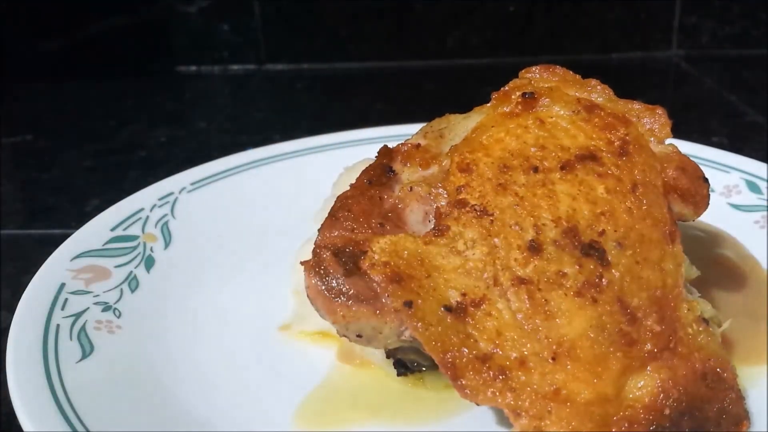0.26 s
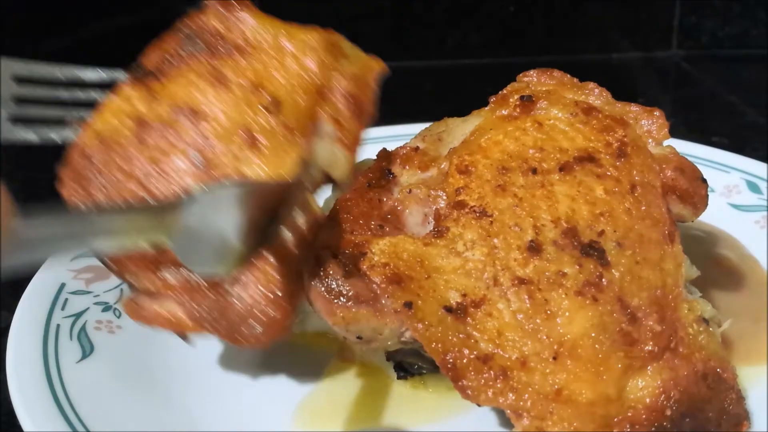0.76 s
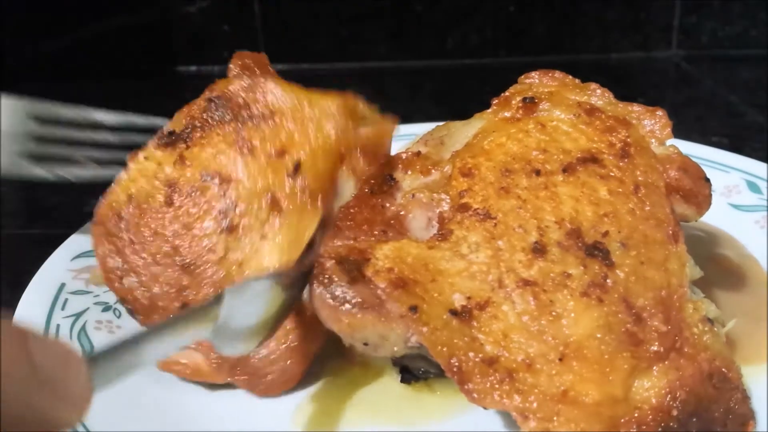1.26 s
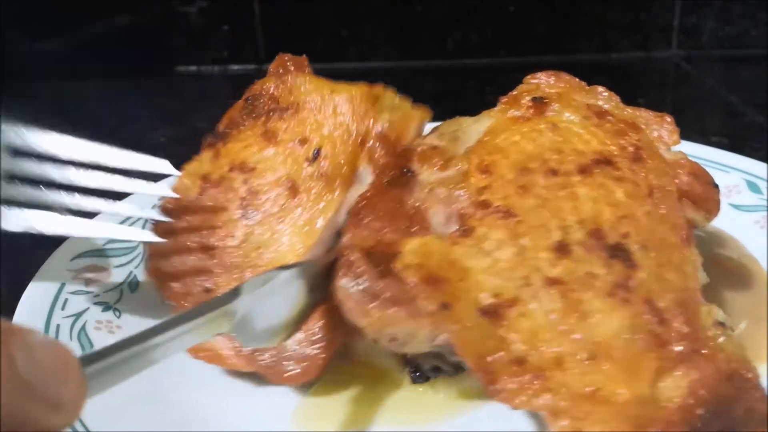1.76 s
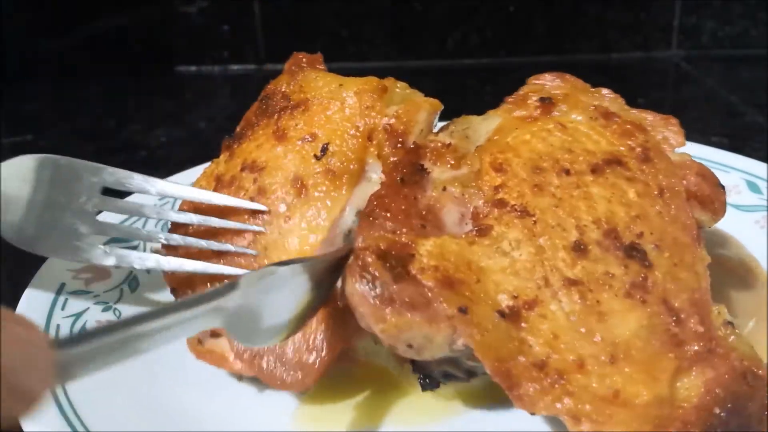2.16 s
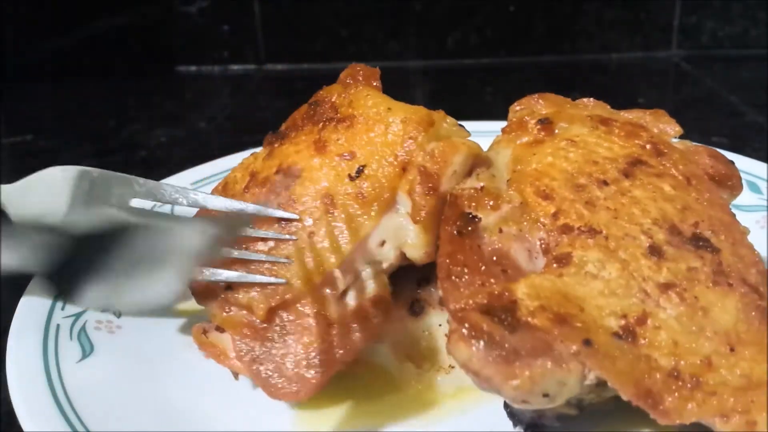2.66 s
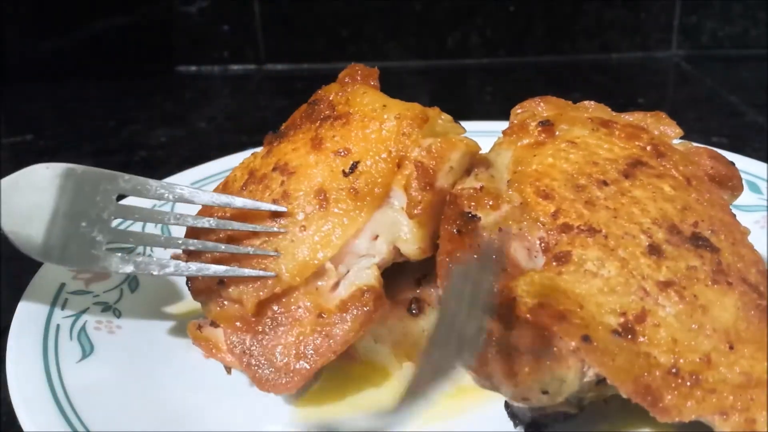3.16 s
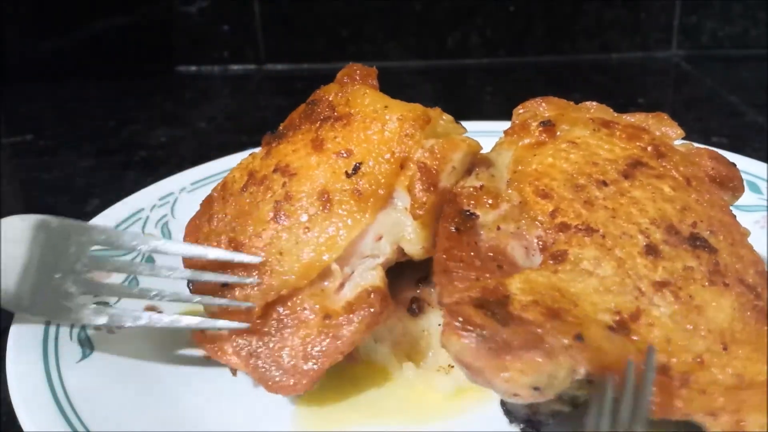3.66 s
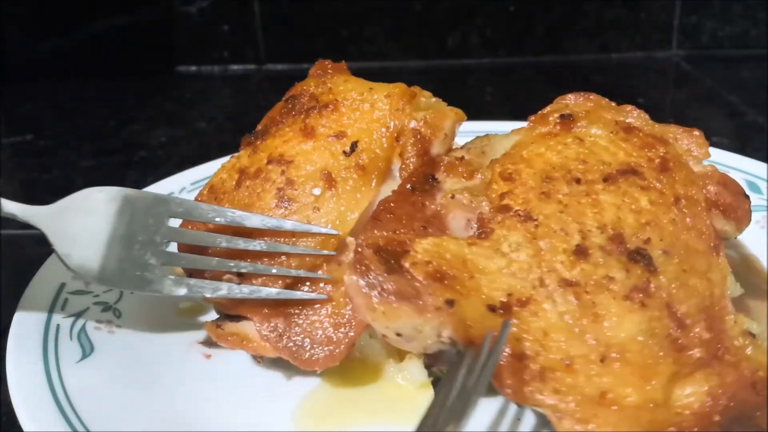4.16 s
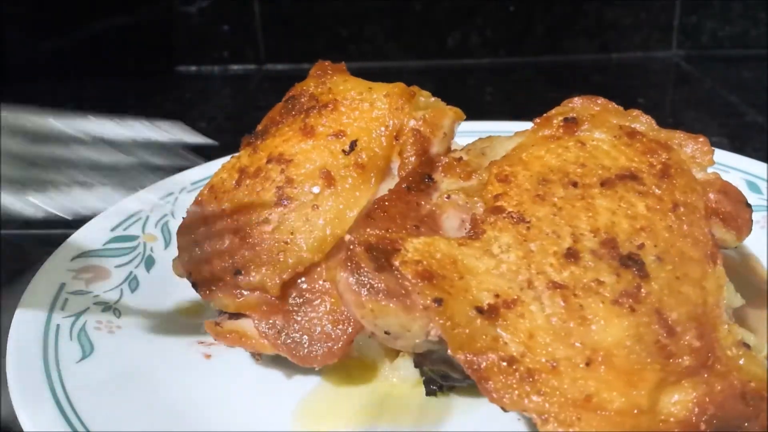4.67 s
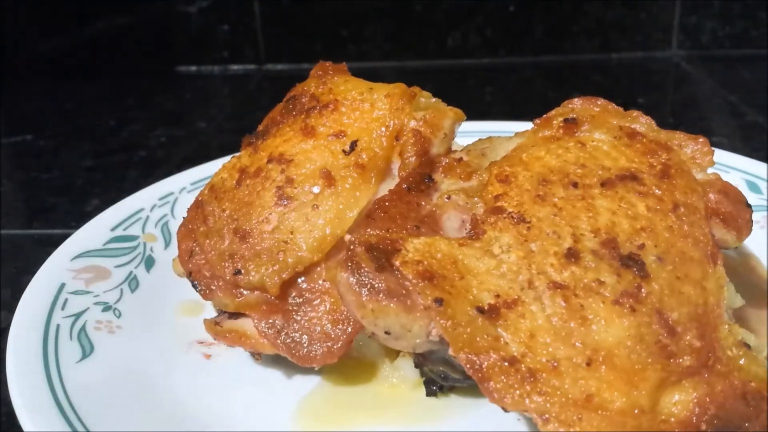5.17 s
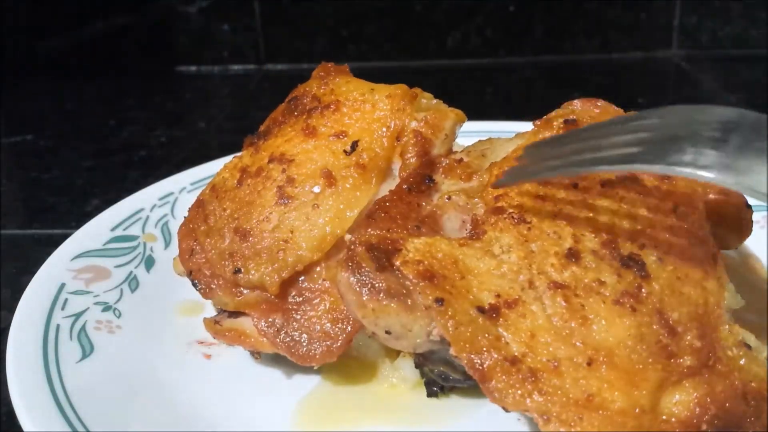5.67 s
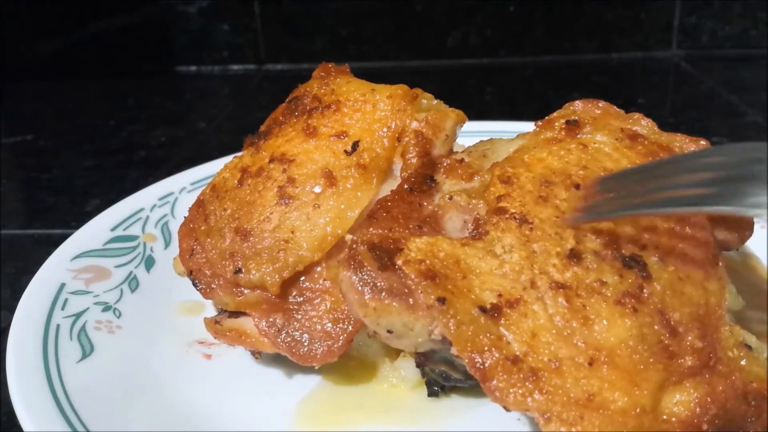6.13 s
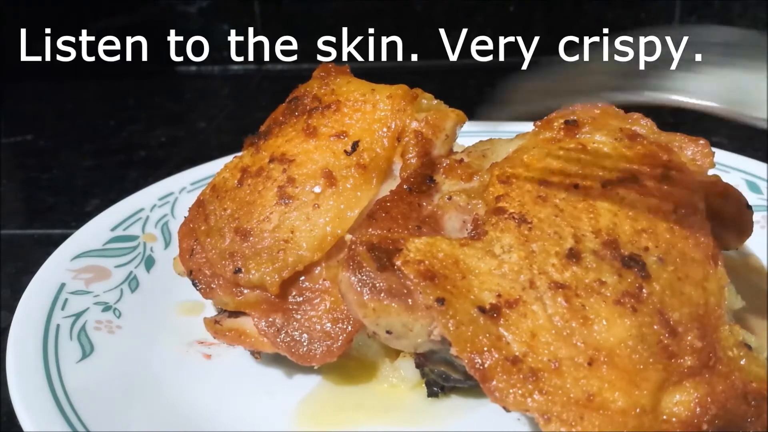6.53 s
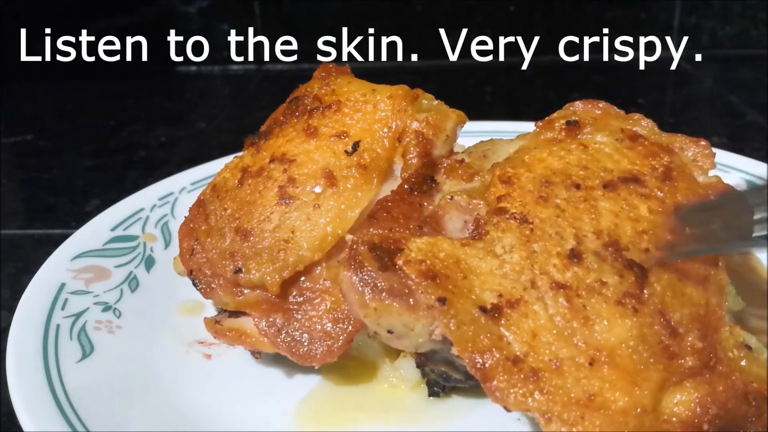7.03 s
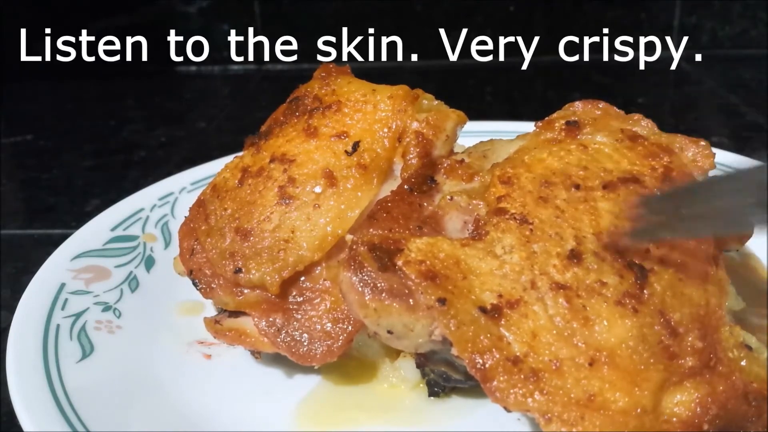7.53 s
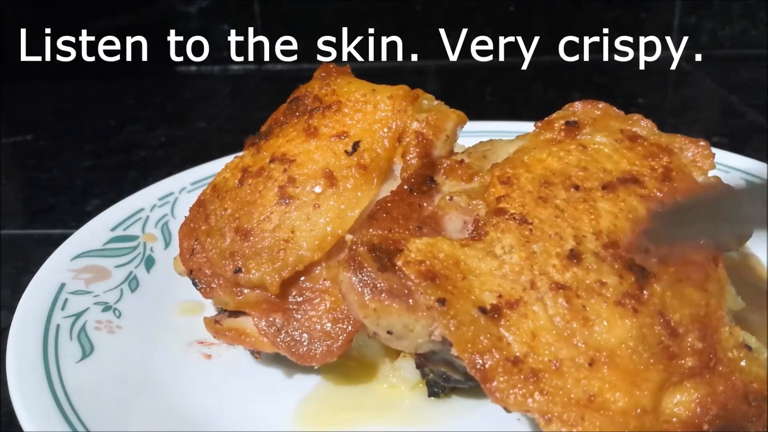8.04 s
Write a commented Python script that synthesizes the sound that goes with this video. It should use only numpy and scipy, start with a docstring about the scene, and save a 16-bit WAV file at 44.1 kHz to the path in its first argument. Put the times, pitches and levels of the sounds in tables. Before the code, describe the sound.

Close stereo phone pickup in a small, lightly reverberant kitchen. Steady hum and airy hiss sit underneath, thinning out midway and swelling back later. Sparse brittle ticks and dull knocks come from meat handled on a plate. Two brief metallic clatters of cutlery ring out, then muffled thumps. Finally fork tines drag over hard roast skin, making bright, grainy, crunchy scrapes with pauses between.

```python
"""A quiet kitchen, heard close up through a phone with two microphone ports. Filtered noise and hum lines make
the appliance bed; dull bumps are dying tones, faint crackles and rustles of roast skin are resonant noise puffs.
Two clatters of cutlery on a hard surface are noise clacks with ringing steel modes. Then a fork drags over the
crisp skin in short strokes: dense snaps that also ring the fork. Near the start the sound briefly drops out."""
import sys
import numpy as np
from scipy import signal
from scipy.fft import rfft, irfft
from scipy.io import wavfile
from scipy.ndimage import uniform_filter1d

SR = 44100
rng = np.random.default_rng(int(sys.argv[2]) if len(sys.argv) > 2 else 0)


def dump(signal):
    """Clip the signal to [-1, 1] and save it as 16-bit WAV at the path in sys.argv[1]."""
    limited = np.clip(np.atleast_2d(signal).T, -1, 1)
    pcm = np.round(limited * 32767).astype(np.int16)
    wavfile.write(sys.argv[1], SR, pcm)


N = 366030
DROPOUT_S = (0.342, 0.3745)  # start and end of the brief silence


def amp(db):
    """Decibels to amplitude."""
    return 10 ** (np.asarray(db) / 20)


def evened(x):
    """Scales to an RMS of one."""
    return x / np.sqrt(np.mean(x ** 2) + 1e-20)


def read(points, hz):
    """Reads a curve of (Hz, value) points, straight over log frequency."""
    f, value = np.transpose(points)
    return np.interp(np.log(hz + 1), np.log(f + 1), value)


def coloured(x, points):
    """Filters by a dB spectrum scaled so that white noise keeps its level."""
    gain = amp(read(points, np.fft.rfftfreq(x.shape[-1], 1 / SR)))
    return irfft(rfft(x) * evened(gain), x.shape[-1])


def mode(x, hz, width_hz):
    """One resonance: a click rings at hz, and a wider resonance dies sooner."""
    pole = np.exp((2j * np.pi * hz - np.pi * width_hz) / SR)
    return signal.lfilter([1], [1, -pole], x).imag


def bursts(rows):
    """Noise puffs from rows (start_s, level_db, decay_s): quick rise, exponential fall."""
    out, t = np.zeros(N), np.arange(4410) / SR
    for start_s, level_db, decay_s in rows:
        u = t / max(decay_s, 3e-4)
        envelope = (1 - np.exp(-6.0 * u)) * np.exp(-u)
        puff = amp(level_db) * envelope * rng.standard_normal(len(t))
        part = out[round(start_s * SR):][:len(t)]
        part += puff[:len(part)]
    return out


# Likeness of the two ports, for diffuse sound: freq_hz, correlation (no unit; negative is out of phase)
PORT_LIKENESS = [(40, 1), (100, 1), (200, 0.27), (320, 0.58), (640, 0.14), (1400, -0.38), (3000, 0.084),
                 (15000, -0.099)]


def noise_pair(spectrum, patchy_db):
    """Two-port noise with drifting patches, alike in the bass."""
    frames, hz = N // 256 + 5, np.fft.rfftfreq(1024, 1 / SR)
    a, b, c, d, patches = rng.standard_normal((frames, 513, 5)).T
    patches = uniform_filter1d(patches, 14, 0)  # smooth over frequency
    patches = evened(uniform_filter1d(patches, 10, 1))  # smooth over time
    same = np.clip(read(PORT_LIKENESS, hz), -1, 1)[:, None]
    left, other = a + 1j * b, c + 1j * d
    z = np.array([left, same * left + np.sqrt(1 - same ** 2) * other])
    z *= amp(read(spectrum, hz)[:, None] + patchy_db * patches)
    return evened(signal.istft(z, nperseg=1024, noverlap=768)[1][:, :N])


# Reverb of the kitchen: freq_hz, t60_s
KITCHEN_DECAY = [(250, 0.49), (660, 0.5), (1740, 0.39), (4590, 0.31)]


def kitchen_tail():
    """Sparse random echoes at both ports, alike for long waves, that die by the kitchen's decay."""
    taps = np.zeros((2, SR // 2))
    at = np.arange(200, SR // 2 - 20, 20) + rng.integers(0, 20, (2, (SR // 2 - 201) // 20))
    np.put_along_axis(taps, at, rng.choice([-1., 1.], at.shape), 1)
    f, t, z = signal.stft(taps, SR, nperseg=256)
    same = np.clip(read(PORT_LIKENESS, f), 0, 1)[:, None]
    z = np.array([z[0], same * z[0] + np.sqrt(1 - same ** 2) * z[1]])
    decay = amp(-60 * t / read(KITCHEN_DECAY, f)[:, None])
    tail = signal.istft(z * decay, SR, nperseg=256)[1]
    return tail / np.linalg.norm(tail[0])


def heard(x, wet_db, apart_rad, pan_db):
    """Reaches both ports: the treble arrives out of phase round the phone body; the kitchen answers."""
    hz = np.fft.rfftfreq(N, 1 / SR)
    uneven = 1 + 0.31 * np.interp(hz, np.linspace(0, SR / 2, 80), rng.standard_normal(80))
    apart = apart_rad * uneven * np.clip((hz - 500) / 4000, 0, 1)  # only short waves feel the port cavities
    turn = np.exp(1j * apart / 2) * amp(pan_db / 2)
    direct = irfft(rfft(x) * np.array([turn, 1 / turn]), N)
    reverb = signal.fftconvolve(x[None], kitchen_tail(), axes=1)[:, :N]
    return direct + amp(wet_db) * reverb


# Course of the appliance bed, before fixed trims: time_s, low_level_db (wash and hum), hiss_level_db
BED_LEVELS = [(0.0, -53, -48.5), (0.55, -53.5, -47), (0.9, -54.5, -50.5), (2.5, -55, -51.5),
              (3.6, -56.5, -54), (4.0, -60, -53.5), (4.2, -61, -58.5), (5.201, -61.5, -59.5),
              (5.27, -54, -55.5), (5.5, -51.5, -49.5), (5.8, -50.5, -50.5), (7.4, -50, -49),
              (8.3, -48.5, -47.5)]
# Low wash of the room, relative colour: freq_hz, density_db (per Hz)
WASH_SPECTRUM = [(20, -23), (35, -21.5), (55, -11), (75, -29), (110, -12), (200, -5), (260, -8),
                 (340, -5.5), (500, -8), (800, -10), (1150, -14), (2500, -20), (4000, -52)]
# Hiss, relative colour; also serves the air around the strokes: freq_hz, density_db (per Hz)
HISS_SPECTRUM = [(530, -26.5), (900, -3.5), (1120, -8.5), (1220, -4), (2020, -7), (2600, -3.5), (4150, -4),
                 (6330, 0.5), (7770, 1), (9420, -8.5), (14900, -15), (16000, -32)]
# Appliance hum lines: freq_hz, width_hz, middle_level_db, outer_level_db (both against the untrimmed wash;
# the outer balance plays before the dropout and late on)
HUM_LINES = [(62, 3.3, -11, -15), (102, 3.8, -11, -10.5), (119.34, 1.37, -13, -10.5),
             (241.5, 7, -13.5, -20), (264, 3.4, -19, -22), (298.7, 1.2, -9, -12.5), (320.5, 1.27, -5, -6),
             (362.3, 8.3, -6, -6.5), (390, 1.5, -11.5, -25), (419.7, 4.2, -15.5, -11),
             (553, 16, -28.5, -17.5), (599.3, 1.25, -4.5, -11.5), (727, 2, -15.5, -24),
             (773, 2.4, -25, -31), (830, 2.7, -20.5, -21.5)]
HUM_SHIFT_S, HUM_GLIDE_S = 4.97, 0.46  # the hum balance starts to shift, and takes this long
WASH_TRIM_DB, HISS_TRIM_DB = -2.0, -2.0


def background():
    """Low wash, hum lines and hiss; each line is narrow noise plus a tone, steadier the narrower it is."""
    t = np.arange(N) / SR
    time_s, low_db, hiss_db = np.transpose(BED_LEVELS)
    outer = np.clip((t - HUM_SHIFT_S) / HUM_GLIDE_S, 0, 1) + (t < DROPOUT_S[0])
    low = amp(WASH_TRIM_DB) * noise_pair(WASH_SPECTRUM, patchy_db=2.5)
    for hz, width_hz, middle_db, outer_db in HUM_LINES:
        a, b = rng.standard_normal((2, N))
        apart = 0.33 * min(hz / 200, 1) * b  # the ports differ less in the bass
        line = evened(mode(np.array([a + apart, a - apart]), hz, width_hz))
        tone = np.sin(2 * np.pi * (hz * t + rng.random()))
        line = evened(line + 4.2 / width_hz * tone)
        low = low + amp(middle_db + outer * (outer_db - middle_db)) * line
    hiss = noise_pair(HISS_SPECTRUM, patchy_db=2.0)
    hiss = hiss * amp(np.interp(t, time_s, hiss_db) + HISS_TRIM_DB)
    return low * amp(np.interp(t, time_s, low_db)) + hiss


# Dull bumps through table and phone: start_s, tone_level_db (before the ports), pitch_hz, t60_s
BUMP_HITS = [(0, -45.5, 74.8, 0.29), (0.249, -40, 95, 0.21), (1.45, -50, 1015, 0.091),
             (2.916, -48, 1066, 0.096), (3.702, -43, 318, 0.28), (3.721, -41.5, 487, 0.25),
             (5.27, -58, 874, 0.16), (5.054, -46.5, 90, 0.44), (5.149, -29.5, 58.5, 0.056),
             (5.184, -36, 96.5, 0.071), (5.26, -40, 467, 0.1), (5.286, -39.5, 392, 0.27)]


def bumps():
    """Soft-edged dying tones with a rough body of noise, nearly alike at both ports."""
    out, t = np.zeros(N), np.arange(SR // 2) / SR
    for start_s, level_db, hz, t60_s in BUMP_HITS:
        part = out[round(start_s * SR):][:len(t)]
        body = amp(-6.0) * evened(mode(rng.standard_normal(len(t)), hz, 1.3 * hz))
        soft_edge = np.minimum(t * hz / 0.47, 1)  # about half a cycle
        part += amp(level_db - 60 * t / t60_s) * soft_edge * (np.sin(2 * np.pi * hz * t) + body)
    return heard(out, wet_db=-12, apart_rad=1.2, pan_db=0.0)


# Crackles of the handled meat: start_s, drive_level_db (into the resonances)
CRACKLE_HITS = [(0.6604, -38), (0.9448, -36.5), (1.269, -40), (1.372, -37), (1.5996, -39), (2.228, -37.5),
                (2.2905, -29), (2.363, -49), (2.415, -39), (2.6773, -44), (2.8529, -46), (3.2215, -45),
                (3.9404, -31.5), (4.0552, -49), (4.438, -44), (4.8045, -43.5), (5.483, -39.5)]
# Short swelling rustles: start_s, drive_level_db (into the resonances), centre_hz, length_s
RUSTLE_SWELLS = [(1.372, -49, 7100, 0.061), (1.689, -53, 6900, 0.073), (1.941, -55.5, 4500, 0.039),
                 (2.277, -44, 7400, 0.034), (3.21, -59, 6520, 0.037), (4.794, -57.5, 7200, 0.078),
                 (5.259, -56, 2580, 0.093)]
CRACKLE_DECAY_S, CRACKLE_HZ = 0.0028, 7700
HANDLING_S, FAINT_PER_S, FAINT_DB = (0.4, 3.6), 5, -47  # faint chance crackles while the meat is moved


def crackles():
    """Brittle skin gives way in puffs of noise, each shaped by two equal wide resonances in a row."""
    count = round(FAINT_PER_S * (HANDLING_S[1] - HANDLING_S[0]))
    when, size = rng.random((count, 2)).T
    faint = zip(np.interp(when, [0, 1], HANDLING_S), FAINT_DB + 6.0 * size)
    out = bursts([(start_s, level_db, CRACKLE_DECAY_S) for start_s, level_db in [*CRACKLE_HITS, *faint]])
    out = mode(out, CRACKLE_HZ, 3000)
    out = mode(out, CRACKLE_HZ, 3000) / 2
    for start_s, level_db, hz, length_s in RUSTLE_SWELLS:
        length = round(length_s * SR)
        puff = amp(level_db) * np.hanning(length) * rng.standard_normal(length)
        out[round(start_s * SR):][:length] += mode(mode(puff, hz, 3260), hz, 3260)
    out = signal.lfilter(*signal.butter(2, 2500, "high", fs=SR), out)  # tiny fractures radiate no bass
    return heard(out, wet_db=-2.0, apart_rad=1.3, pan_db=-1.0)


# Cutlery blows, relative before trims: start_s, blow_level_db, ringing_db (steel against its blow)
CUTLERY_BLOWS = [(3.684, -1.5, -11.5), (3.7028, -15.5, 5), (3.7084, -10.5, 5), (3.714, -8.5, 2.5),
                 (3.7286, -9, -3.5), (3.7364, -13.5, 1), (3.7508, -15.5, 0), (4.5678, -10.5, 11.5),
                 (4.5731, -15, 15.5), (4.585, -11.5, 7), (4.5947, -16, -14), (4.6194, -20, 8),
                 (4.6277, -19.5, 10), (4.6349, -22, 2)]
# Long tones of a freely hanging part: start_s, pitch_hz, level_db (before the ports), t60_s
HANGING_TONES = [(4.6, 3386, -43, .55), (4.632, 2677, -46, .85)]
# Toneless part of a blow, relative colour: freq_hz, density_db (per Hz)
CLACK_SPECTRUM = [(150, -43), (300, -38), (500, -11.5), (1000, -11.5), (1800, -3.5), (3200, -6), (4500, 4),
                  (6000, 2.5), (8000, 2.5), (9500, -8.5), (12000, -23), (15000, -42)]
# Modes of the cutlery: pitch_hz
STEEL_MODES = [935, 1787, 2290, 2455, 2560, 2830, 4250, 4482, 4630, 5118, 5207, 5477, 5661, 6036, 6086,
               6300, 6464, 6540, 7110, 7181, 7840, 8212, 8700, 9420, 10650, 11430, 12020, 12460, 13370,
               14925]
# Relative strength of those modes, in the same order: level_db
STEEL_LEVELS = [-15.5, -8, -12.5, -10.5, -16, -8, -15, -4, -14, -1, -2, -4, -4, 6, -3, -2, -9, -15, 0, -1.5,
                -8, -2, -20, -13, -19, -14, -23, -20, -21, -26]
# Ring time of the steel, before each clatter's share: freq_hz, t60_s
STEEL_DECAY = [(900, .1), (1800, 0.095), (3000, 0.08), (5000, 0.072), (6100, 0.06), (7200, 0.081),
               (9000, 0.037), (15000, 0.052)]
CLACK_DECAY_S, CLICK_DECAY_S = 0.0043, 0.00031
# one value for each clatter: clack below 3 kHz, modes below 5 kHz, share of the ring time
CLACK_LOW_DB, LOW_MODES_DB, RING_SHARE = (4.5, -0.5), (0.5, -9.0), (1.57, 0.75)


def clatter():
    """Each blow is a clack that sets the steel ringing; where it lands changes each mode's share and phase."""
    clacks, rings, t = np.zeros(N), np.zeros(N), np.arange(SR) / SR
    u = t[:SR // 3]
    hz = np.array(STEEL_MODES)[:, None]
    for start_s, blow_db, ringing_db in CUTLERY_BLOWS:
        second = int(start_s > 4)  # which of the two clatters
        envelope = np.exp(-t / CLACK_DECAY_S) + 1.1 * np.exp(-t / CLICK_DECAY_S)
        hit = amp(blow_db) * envelope * rng.standard_normal(SR)
        lows = signal.lfilter(*signal.butter(2, 3000, fs=SR), hit)
        clacks[round(start_s * SR):][:SR] += hit + (amp(CLACK_LOW_DB[second]) - 1) * lows
        mode_db = np.array(STEEL_LEVELS)[:, None] + LOW_MODES_DB[second] * (hz < 5000)
        mode_db = mode_db + blow_db + ringing_db - 17.5
        mode_db = mode_db + 3.5 * rng.standard_normal(hz.shape)
        fall_db = 60 * u / read(STEEL_DECAY, hz) / RING_SHARE[second]
        tones = amp(mode_db - fall_db) * np.sin(2 * np.pi * (hz * u + rng.random(hz.shape)))
        rings[round(start_s * SR):][:len(u)] += tones.sum(0) * np.minimum(u / 0.0016, 1)
    for start_s, tone_hz, level_db, t60_s in HANGING_TONES:
        tone = amp(level_db - 60 * t / t60_s) * np.sin(2 * np.pi * tone_hz * t)
        rings[round(start_s * SR):][:SR] += tone
    clacks = amp(-5.5) * coloured(clacks, CLACK_SPECTRUM)
    return heard(clacks + rings, wet_db=-5.5, apart_rad=1.44, pan_db=1.0)


# Fork strokes, relative pressure: land_s, dig_s, lift_s, dug_in_db, at_lift_db
FORK_STROKES = [(6.087, 6.146, 6.35, -39, -44.5), (6.777, 6.778, 6.77, -42, -39.5),
                (6.894, 6.944, 6.96, -38.5, -37), (6.996, 7.084, 7.13, -36, -38.5),
                (7.492, 7.587, 7.71, -36.5, -45), (8.023, 8.086, 8.2, -36.5, -40.5)]
LANDING_DB, DIG_S, LIFT_DB_PER_S = -10, 0.037, 600  # light touch, time to dig in, lift-off
FLESH_DB = (-10.5, -2.5)  # the low part grows from start to end of a stroke


def strokes():
    """Pressure of the tines (land lightly, dig in, ease, lift) and the share of the low part."""
    t, level, low = np.arange(N) / SR, np.zeros(N), np.zeros(N)
    for land_s, dig_s, lift_s, dug_in_db, at_lift_db in FORK_STROKES:
        db = np.interp(t, [dig_s - DIG_S, dig_s, lift_s], [dug_in_db + LANDING_DB, dug_in_db, at_lift_db])
        press = (t > land_s) * amp(db - LIFT_DB_PER_S * np.maximum(t - lift_s, 0))
        level += press
        low += press * amp(np.interp(t, [land_s, lift_s], FLESH_DB))
    return level, low / (level + 1e-20)


# Tines catching on a blister: start_s, drive_level_db (before skin and fork)
BLISTER_CATCHES = [(6.0921, -44), (6.113, -27.5), (6.1384, -31), (6.1549, -17), (6.1604, -17),
                   (6.2043, -27), (6.2372, -25), (6.2677, -27), (6.3076, -27), (6.3144, -26.5),
                   (6.3325, -24.5), (6.3474, -23.5), (6.7535, -32.5), (6.789, -29.5), (6.8603, -37),
                   (6.9314, -29), (6.9391, -20), (6.9606, -22.5), (7.0893, -34), (7.1392, -34),
                   (7.1596, -26), (7.4884, -38), (7.5054, -36), (7.5423, -37), (7.5802, -25), (7.5974, -39),
                   (7.9884, -29.5), (7.9927, -23.5), (8.0651, -47), (8.079, -27), (8.1389, -24)]
# Crisp skin, relative colour: freq_hz, density_db (per Hz)
SKIN_SPECTRUM = [(500, -42), (1200, -26), (2300, -18), (3300, -5), (4300, -5.5), (5800, 0), (6800, 2.5),
                 (8000, -4), (9800, -6.5), (11300, -8), (13000, -8.5), (15000, -19)]
# Modes of the fork: pitch_hz
FORK_MODES = [3360, 4050, 5090, 6540, 7030, 7280, 8240, 9060, 10700, 12700, 13450, 15280]
# Damping and relative strength of those modes, in the same order: width_hz, level_db
FORK_RESONANCES = [(140.4, -8), (100, -31), (80, -1), (88, 3.5), (50, -15.5), (75, -2), (140, -19),
                   (92.5, 0), (50, 0.5), (110, -26), (160, -40), (50, -11)]
CATCH_DECAY_S, SMALL_CATCHES_PER_S, SMALL_CATCH_DB = 0.0021, 120, 3
SNAPS_PER_S, FORK_DB, AIR_DB = 8000, -49.0, -8


def scrape():
    """Tines skip over the brittle skin: dense uneven snaps ring the fork, and airy hiss swells around them."""
    level, low = strokes()
    size = amp(1.8 * np.minimum(rng.exponential(1, N), 5)) * rng.standard_normal(N)
    snaps = size * (rng.random(N) < SNAPS_PER_S / SR)
    clumps = amp(2.2 * evened(uniform_filter1d(rng.standard_normal(N), 160)))  # snaps come in bunches
    small = rng.random(N) < SMALL_CATCHES_PER_S / SR
    small = signal.lfilter([1], [1, -np.exp(-1 / (CATCH_DECAY_S * SR))], small)
    small = amp(SMALL_CATCH_DB) * small * rng.standard_normal(N)
    catches = bursts([(start_s, level_db, CATCH_DECAY_S) for start_s, level_db in BLISTER_CATCHES])
    drive = level * (evened(snaps * clumps) + small) + catches
    grip = rng.standard_normal((N // 256 + 1, len(FORK_RESONANCES)))
    grip = amp(3.2 * evened(uniform_filter1d(grip, 12, 0))).repeat(256, 0)[:N]
    fork = np.zeros(N)
    for k, (hz, (width_hz, level_db)) in enumerate(zip(FORK_MODES, FORK_RESONANCES)):
        ringing = np.sqrt(width_hz) * mode(drive, hz, width_hz)
        fork += grip[:, k] * amp(level_db) * ringing  # the shifting grip sways each mode's level
    fork = amp(FORK_DB) * signal.lfilter(*signal.butter(2, 2500, "high", fs=SR), fork)
    flesh = low * signal.lfilter(*signal.butter(2, [600, 2600], "band", fs=SR), drive)
    skin = coloured(drive, SKIN_SPECTRUM)
    air = amp(AIR_DB) * uniform_filter1d(level, size=4000) * noise_pair(HISS_SPECTRUM, patchy_db=5.0)
    return heard(skin + fork + flesh, wet_db=-5.5, apart_rad=1.46, pan_db=1.5) + air


def scene():
    """All layers at both ports."""
    return background() + bumps() + crackles() + clatter() + scrape()


# Colour difference of the two ports, split evenly between them: freq_hz, left_minus_right_db
PORT_COLOURS = [(60, -1.5), (125, 2.5), (300, -3.5), (700, 2), (1300, -0.5), (3000, 1), (5000, 1),
                (6300, 5.5), (7500, -7.5), (8500, -9), (10500, -6), (15000, -4)]
EDGE_HZ = 15800  # upper band limit


def record(dry):
    """Port colours, the brief dropout, soft overload that rounds the loudest peaks, then the band limit."""
    half_db = read(PORT_COLOURS, np.fft.rfftfreq(N, 1 / SR)) / 2
    ports = irfft(rfft(dry) * amp([half_db, -half_db]), N)
    t = np.arange(N) / SR
    fading = amp(-18 - 1500 * np.maximum(t - DROPOUT_S[0], 0))  # drops 18 dB, then falls 1500 dB/s
    kept = np.where((t > DROPOUT_S[0]) & (t < DROPOUT_S[1]), fading, 1)
    rounded = 0.89 * np.tanh(ports * kept / 0.91)
    band_limit = signal.firwin(511, EDGE_HZ, window=("kaiser", 9), fs=SR)
    return signal.oaconvolve(rounded, band_limit[None], "same")


dry = scene()
out = record(dry)
dump(out)
```